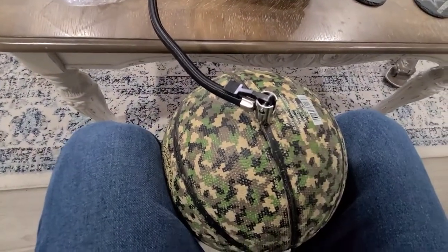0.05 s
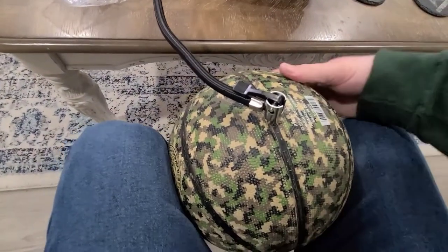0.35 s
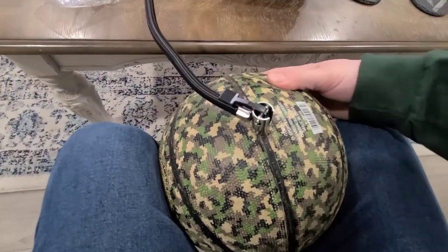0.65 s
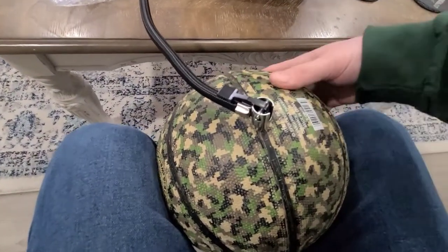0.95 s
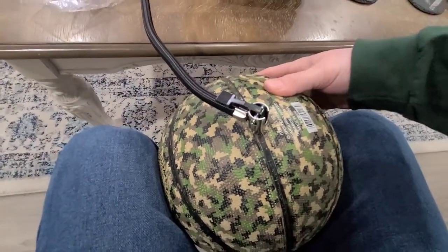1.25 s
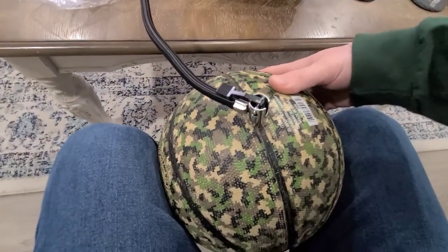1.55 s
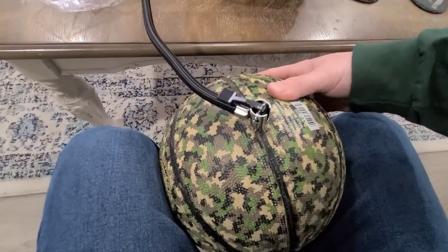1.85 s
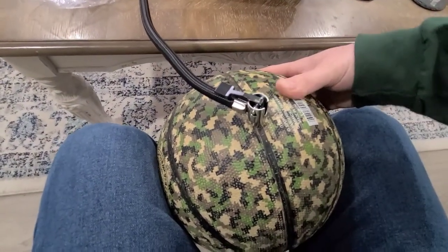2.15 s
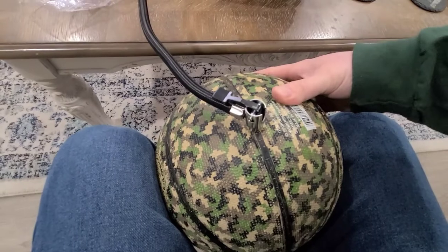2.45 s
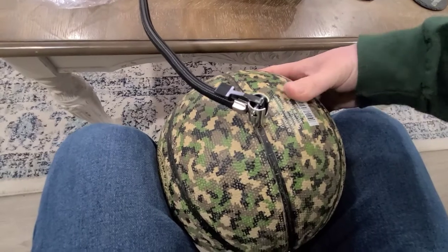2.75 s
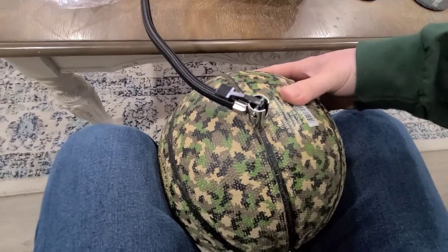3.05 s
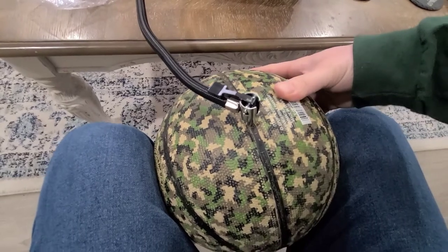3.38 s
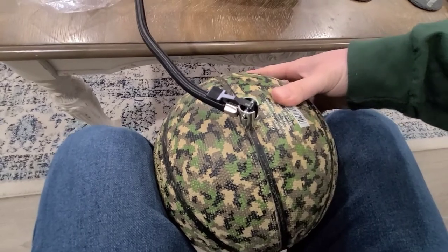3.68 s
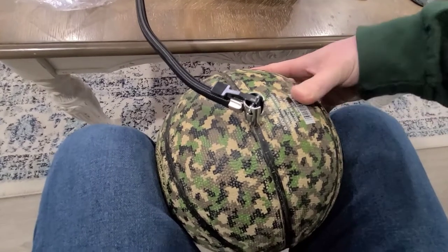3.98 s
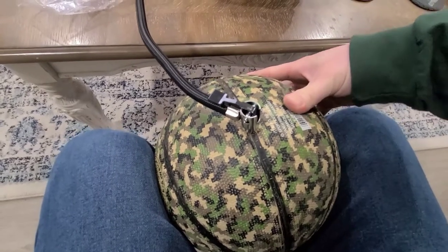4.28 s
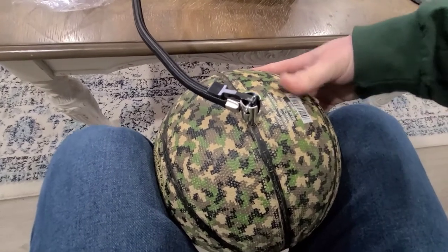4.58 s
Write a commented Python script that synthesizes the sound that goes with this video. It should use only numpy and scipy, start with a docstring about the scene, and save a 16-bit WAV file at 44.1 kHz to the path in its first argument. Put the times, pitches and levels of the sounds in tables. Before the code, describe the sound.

A small air compressor runs steadily indoors with a high gear whine, fast rattling buzz and hiss as it pumps up a ball.

```python
"""Indoors, a small geared piston compressor pumps up a ball, slowing a little as the pressure builds.
The piston shakes the housing about 48 times a second and knocks ever louder through play in its rod.
The gears whine and rattle with the load of each stroke, the motor hums, a panel sings and air hisses.
A valve ticks sharply, later only in spells. A hand thuds softly on the ball near the start.
A faint rumble lies underneath."""
import sys
import numpy as np
from scipy import signal
from scipy.fft import rfft, irfft
from scipy.io import wavfile
from scipy.ndimage import map_coordinates

SR = 44100
rng = np.random.default_rng(int(sys.argv[2]) if len(sys.argv) > 2 else 0)


def unload_audio(sound):
    """Save the sound as a 16-bit wav file, at the path given as the first command line argument."""
    columns = np.transpose(np.atleast_2d(sound))
    # keep every value between -1 and 1, then stretch to whole-number steps
    steps = np.round(np.clip(columns, -1, 1) * 32767)
    wavfile.write(sys.argv[1], SR, steps.astype(np.int16))


N = 203986
TIME_S = np.arange(N) / SR
FREQS_HZ = np.maximum(np.arange(N // 2 + 1) * SR / N, 1)
START_TURNS_PER_S = 48.554
WHEEL_TEETH, PINION_TEETH = 70, 12
REPEAT_TURNS = 6  # the same teeth meet again

# Piston and housing tones. Each row: crank multiple, level in dB, left-right in dB, left lead in rad.
PISTON_TONES = [(1, -37.0, -0.2, -0.0), (2, -36.6, -0.1, -0.0), (3, -49.0, -0.2, 0.0),
                (5, -40.0, -0.0, -0.0), (6, -42.7, 0.0, -0.2), (7, -40.3, -0.2, -0.0),
                (8, -43.1, -0.8, -0.0), (10, -53.2, -4.6, 0.4), (11, -50.4, -9.0, 0.6),
                (12, -52.8, -6.9, 1.8), (14, -35.3, 0.2, -0.1), (15, -48.9, 2.0, 1.2),
                (16, -47.5, 1.2, 0.2), (17, -36.4, 1.2, 0.5), (22, -50.1, 7.9, 1.2), (24, -45.9, 5.6, -0.1),
                (25, -48.4, 7.1, 0.8), (26, -47.7, -0.1, -2.0), (27, -43.6, 9.5, 0.5),
                (28, -49.3, 2.2, 0.4), (31, -50.4, 0.3, -1.0), (35, -45.0, -5.9, 0.1),
                (36, -50.0, -6.8, 0.4), (39, -46.2, -3.5, 2.3), (41, -44.7, -2.0, 1.1),
                (47, -47.4, -4.5, 1.6), (49, -44.1, -0.7, -3.0), (50, -42.0, -4.0, 2.8),
                (51, -36.7, -2.7, 3.1), (53, -43.6, 1.9, 2.9), (54, -38.7, -3.1, -2.5),
                (55, -43.1, 4.1, 1.8), (57, -41.7, -2.1, 1.7)]
# Gear partials round the tooth rate and its overtones.
# Each row: crank multiple, level in dB, left-right in dB, left lead in rad.
GEAR_TONES = [(58, -38.2, 5.2, 1.5), (60, -37.3, 2.9, 1.6), (61, -42.0, 10.8, 2.8), (62, -42.2, 2.2, 1.2),
              (63, -35.6, 3.2, 2.6), (64, -38.8, 8.3, 2.0), (65, -35.8, 4.1, 2.7), (66, -32.9, 5.2, 3.0),
              (67, -35.0, 2.6, 3.1), (68, -29.2, 6.2, 2.8), (69, -36.5, 6.1, 1.4), (70, -27.3, 3.3, 1.8),
              (71, -32.7, 3.1, 1.7), (126, -41.1, 6.3, 2.2), (127, -39.3, 6.7, 2.5), (128, -46, 3, 1),
              (131, -37.5, 9.5, -2.6), (135, -45, 3, 0), (146, -47, 3, 0), (147, -45, 3, 0),
              (133, -34.5, 8.7, -1.5), (134, -42.0, 6.3, -0.7), (136, -32.9, 7.4, -0.1),
              (137, -37.5, 7.3, 0.8), (138, -35.3, 9.3, -0.1), (139, -32.4, 8.7, -1.3),
              (140, -32.6, 6.4, 0.5), (141, -30.3, 6.8, -0.5), (142, -33.0, 8.1, -1.2),
              (143, -35.2, 3.0, -0.8), (209, -57.5, -9.2, 2.4), (210, -55, -11.7, 2.8),
              (211, -52, -9.2, 2.3), (279, -47, -2, 0.5), (280, -46, -3, 1), (281, -46, -2, 0)]
# Tooth load, greatest in compression. Each row: place in turns, width in turns, level in dB.
TOOTH_LOADS = [(.32, .1, -5.3), (.63, .118, 0)]
# Narrow resonances on the whine's path. Each row: centre in Hz, width in Hz, gain in dB.
WHINE_PEAKS = [(3306, 8, 3.3), (3320, 10, -1.5), (3390, 42, 0.5), (6620, 30, 0.5), (6790, 15.5, 4),
               (10090, 77, 12)]
# Base spectrum of rattle and air. Each row: frequency in Hz, density in dB per Hz.
RUSH_SPECTRUM = [(30, -66), (70, -67), (125, -66.5), (180, -74), (500, -73), (1000, -73), (1600, -67.5),
                 (2400, -58), (3300, -56.5), (3750, -68.5), (4900, -59.5), (5700, -61), (8500, -71.5),
                 (12600, -67), (13600, -58.5)]
# Housing resonances. Each row: centre in Hz, width in Hz, gain in dB.
HOUSING_PEAKS = [(300, 99, 10.5), (681, 40, 11.5), (820, 57, 12.5), (1190, 149, 8), (2035, 99, 5.5),
                 (6790, 555, 9), (10020, 91, 5.5), (13300, 140, 2.5)]
# Clatter as the load shifts. Each row: place in turns, level in dB re the steady rattle.
TOOTH_CLATTERS = [(.23, -6), (0.391, -1.5), (.73, -23), (0.99, 3)]
# Air puffs of a stroke. Each row: place in turns, width in turns, level in dB re the steady flow.
AIR_PUFFS = [(.25, 0.035, -9), (.55, 0.03, -7.5)]
# Valve tick spectrum. Each row: frequency in Hz, relative density in dB, left-right in dB.
VALVE_SPECTRUM = [(2000, -40, 0), (5000, -12, 1), (6000, -22, 0), (8500, -23, -3), (12500, -18, -7),
                  (13700, -5, -4), (14700, 3, -2), (15700, -6, 0)]
# Spells of sharp ticking, each sliding later in the stroke. Each row: start in seconds,
# end in seconds, relative level in dB, first place in turns, last place in turns.
VALVE_SPELLS = [(-0.1, 1.97, -21, .48, .52), (2.04, 2.12, -24, .52, .6), (2.35, 2.84, -21, .48, .57),
                (3.15, 3.27, -21, .47, .58), (3.55, 3.89, -19, .49, .6), (4.18, 4.35, -19, .48, .6)]
# Growth of the piston knock. Each row: time in seconds, relative level in dB.
KNOCK_CURVE = [(0, -58), (1.5, -41), (2.3, -36), (4.2, -28), (4.63, -26)]
# Single harder knocks. Each row: time in seconds, relative level in dB.
HARD_BLOWS = [(0.225, -14.5), (0.68, -30), (1.816, -23), (2.066, -22), (3.42, -22), (3.587, -19)]
# Modes rung by a knock. Each row: frequency in Hz, gain in dB, T60 in seconds.
KNOCK_RINGS = [(810, -4, 0.044), (1150, -18, 0.014), (1910, -7, 0.035), (2094, 8.5, 0.041),
               (2790, -8, 0.012)]
# Motor tones, split by the stroke. Each row: motor multiple, added crank multiple, level in dB,
# left-right in dB, left lead in rad.
MOTOR_TONES = [(1, 0, -48, -1.2, 0.1), (1, 2, -48, -0.7, 0.1), (3, -3, -45.2, -1.3, 0.4),
               (1, 8, -44.5, 0, 0), (1, 9, -45.8, -2.7, 1.4), (3, -2, -47.8, 1.3, 0.7),
               (1, 11, -48, 1, 0.5), (3, 0, -38.6, 2.9, 1.3), (4, 0, -49.1, 6.1, 0.4),
               (1, 32, -44.9, -7.2, 0.5), (7, 2, -44.5, -3.9, 1.2), (8, 0, -45, -2, 2), (1, 43, -44, -2, 2),
               (9, -3, -44.1, -4.3, 2.9), (9, 0, -41.7, 0.4, -3.1), (9, 1, -43.6, -3.3, -2.8),
               (11, -1, -40, 4, 2.5)]
# Housing panel tones. Each row: crank multiple, level in dB, left-right in dB, left lead in rad,
# throb depth from 0 to 1.
PANEL_PARTIALS = [(38, -38.6, -7.5, 0.4, .8), (42, -39.4, -5.0, 1.2, .3), (43, -35.2, -2.6, 1.4, .3),
                  (44, -39.3, -0.9, 1.0, .3)]
# Panel response as the speed passes its pitch. Each row: time in seconds, gain in dB.
PANEL_CURVE = [(0, -6), (1.2, -3), (2.0, 1), (3.2, 1.5), (3.9, -1.5), (4.63, -3)]
# Palm on the ball. Each row: start in seconds, level in dB, pitch in Hz, decay in seconds.
PALM_THUDS = [(0.282, -15.5, 122, 0.014)]
# Brief level dips. Each row: time in seconds, gain in dB, width in seconds.
LEVEL_DIPS = [(0.02, -0.8, 0.038), (2.1, -3, 0.013), (3.31, -0.5, 0.047), (4.3, -0.3, 0.054)]
# Stereo image of the noise. Each row: frequency in Hz, coherence from -1 to 1, left-right in dB.
NOISE_IMAGE = [(100, 1, 12), (315, 1, -2), (696, 0.39, 0.5), (1310, 0.39, 2), (2220, -0.085, -3.5),
               (3450, -0.36, 3.5), (6040, 0.049, 1.5), (8100, 0.019, 0.5), (10700, 0.09, -9),
               (15000, -0.14, -3)]


def crank(start_turn=-0.0204, sag_turns_per_s2=0.1921, hunt_turns=0.0022):
    """Turns made so far: the crank slows evenly as pressure builds, and hunts a little."""
    slowing = start_turn + START_TURNS_PER_S * TIME_S - sag_turns_per_s2 * TIME_S ** 2 / 2
    return slowing + hunt_turns * drift(rate_hz=0.71)


def piston(turns, waver_db=0.5):
    """Each stroke shakes the housing at multiples of the crank speed."""
    return sum(tone(turns, k, db, pan, lead, 2 * np.pi * rng.random()) * from_db(waver_db * drift(12))
               for k, db, pan, lead in PISTON_TONES)


def gear_whine(turns, swing=0.0155, fastest_turn=0.453, runout_teeth=0.03, jitter_teeth=0.0019,
               waver_db=1.26):
    """The tooth tone swoops each stroke; its partials slide through narrow resonances."""
    cycle = np.arange(2048) / 2048
    load = sum(from_db(db) * bump(cycle, place, width) for place, width, db in TOOTH_LOADS)
    # the wheel runs fastest just before compression brakes it
    wheel = cycle + swing * np.sin(2 * np.pi * (cycle - fastest_turn)) / (2 * np.pi)
    # an off-centre pinion shifts the mesh once per motor turn
    runout = runout_teeth * np.sin(2 * np.pi * turns * WHEEL_TEETH / PINION_TEETH)
    meshing = turns + (runout + jitter_teeth * drift(21)) / WHEEL_TEETH
    whine = 0
    for k, db, pan, lead in GEAR_TONES:
        overtone = round(k / WHEEL_TEETH) * WHEEL_TEETH
        swoop = load * np.exp(2j * np.pi * (overtone * wheel - k * cycle))
        whine += tone(meshing, k, db, pan, lead, np.angle(swoop.sum())) * from_db(waver_db * drift(8))
    return room(irfft(rfft(whine) * from_db(peaks_db(WHINE_PEAKS)), N))


def rattle_and_air(turns, clatter_width_turns=0.033, loose_db=-2.5, grain_db=1.23, rattle_db=-0.38,
                   air_db=-1.5, buzz_db=-3, hiss_db=-4.5, split_hz=3900, hiss_hz=12000):
    """Rattling teeth fill the housing resonances; above them air rushes in time with the stroke."""
    clatter = 1 + sum(from_db(db) * bump(turns, at, clatter_width_turns) for at, db in TOOTH_CLATTERS)
    flow = 1 + sum(from_db(db) * bump(turns, at, width) for at, width, db in AIR_PUFFS)
    teeth = worn_teeth(turns, 1, level_db=-13) + worn_teeth(turns, REPEAT_TURNS, level_db=-3.5)
    contact = teeth + from_db(loose_db) * rng.standard_normal((2, N))
    rattle = contact * from_db(rattle_db + grain_db * drift(250)) * clatter
    air = (rng.standard_normal((2, N)) + from_db(buzz_db) * teeth) * from_db(air_db) * flow
    housing_db = at_hz(RUSH_SPECTRUM)[0] + peaks_db(HOUSING_PEAKS)
    low_share = 1 / (1 + (FREQS_HZ / split_hz) ** 8)
    top_share = 1 / (1 + (hiss_hz / FREQS_HZ) ** 8)
    low_db = housing_db + 10 * np.log10(low_share)
    high_db = housing_db + 10 * np.log10(1 - low_share + 1e-12) + hiss_db * top_share
    _, pan_db = at_hz(NOISE_IMAGE)
    return coloured(rattle, low_db, pan_db) + coloured(air, high_db, pan_db)


def worn_teeth(turns, period_turns, level_db):
    """Roughness of the tooth faces, repeating as they come round."""
    points = int(SR * TIME_S[-1] / turns[-1]) * period_turns
    faces = from_db(level_db) * rng.standard_normal((2, points))
    position = turns / period_turns % 1 * points
    return np.array([map_coordinates(face, [position], order=3, mode="grid-wrap") for face in faces])


def valve(turns, crack_s=0.0013, tail_s=0.015, tail_db=-11, uneven_db=1.3, gain_db=-27, stray_turns=0.01):
    """Once a stroke the valve snaps: a bright crack with a short spray of reflections."""
    shut_turn = in_time([point for start, end, _, first, last in VALVE_SPELLS
                         for point in ((start, first), (end, last))])
    stroke, age_turns = np.divmod(turns - shut_turn - stray_turns * drift(6.4) + 1, 1)
    age_s = age_turns / START_TURNS_PER_S
    stroke_db = uneven_db * rng.standard_normal(int(stroke.max()) + 1)[stroke.astype(int)]
    burst = np.exp(-age_s / crack_s) + from_db(tail_db) * np.exp(-age_s / tail_s)
    snaps = rng.standard_normal((2, N)) * burst * tick_gain() * from_db(stroke_db + gain_db)
    return coloured(snaps, *at_hz(VALVE_SPECTRUM))


def tick_gain(attack_s=0.048, release_s=0.023, soft_db=-50):
    """The valve closes sharply in spells, softly between them."""
    gain = from_db(soft_db)
    for start, end, db, _, _ in VALVE_SPELLS:
        gate = np.minimum((TIME_S - start) / attack_s, (end - TIME_S) / release_s)
        gain = np.maximum(gain, from_db(db) * np.clip(gate + 0.5, 0, 1))
    return gain


def knock(turns, gain_db=-1, uneven_db=3, throb_db=2, jitter_s=0.0005, early_turns=0.041):
    """Play in the rod lets the piston knock once a turn, unevenly, now and then hard."""
    hits = np.flatnonzero(np.diff(np.floor(turns + early_turns)) > 0)
    hits = np.clip(hits + (jitter_s * SR * rng.standard_normal(len(hits))).astype(int), 0, N - 1)
    trend_db = in_time(KNOCK_CURVE) + throb_db * throb(turns) + gain_db
    hit_db = trend_db[hits] + uneven_db * rng.standard_normal(len(hits))
    hard_s, hard_db = np.transpose(HARD_BLOWS)
    hits = np.append(hits, (hard_s * SR).astype(int))
    hit_db = np.append(hit_db, hard_db)
    ringing = 0
    for hz, db, t60_s in KNOCK_RINGS:
        blows = np.full((2, N), 1e-18)
        blows[:, hits] = from_db(hit_db + db) * (1 + 0.25 * rng.standard_normal((2, len(hits)))) / 2
        radius, step_rad = from_db(-60 / (t60_s * SR)), 2 * np.pi * hz / SR
        feedback = [1, -2 * radius * np.cos(step_rad), radius ** 2]
        ringing += signal.lfilter([0, np.sin(step_rad)], feedback, blows)
    return ringing


def motor(turns, waver_db=1.5, slip_rad=0.6):
    """The faster motor shaft adds unsteady tones that beat against the piston's."""
    ratio = WHEEL_TEETH / PINION_TEETH
    hum = 0
    for m, k, db, pan, lead in MOTOR_TONES:
        phase_rad = 2 * np.pi * rng.random() + slip_rad * drift(2.9)
        hum += tone(turns, m * ratio + k, db, pan, lead, phase_rad) * from_db(waver_db * drift(5.5))
    return hum


def panel(turns, struck_turn=0.019):
    """A housing panel, jolted once a turn, sings and swells each time the same teeth meet."""
    swell = throb(turns)
    tones = sum(tone(turns - struck_turn, k, db, pan, lead, 0) * (1 + depth * swell)
                for k, db, pan, lead, depth in PANEL_PARTIALS)
    return tones * from_db(in_time(PANEL_CURVE))


def palm(rise_s=0.0093):
    """A soft hand makes the ball thud briefly."""
    thuds = 0
    for start_s, db, hz, decay_s in PALM_THUDS:
        age_s = np.maximum(TIME_S - start_s, 0)
        envelope = (1 - np.exp(-age_s / rise_s)) * np.exp(-age_s / decay_s)
        thuds += from_db(db) * np.sin(2 * np.pi * hz * age_s) * envelope
    return thuds


def room(direct, t60_s=0.35, wet_db=-11.5, delay_s=0.004):
    """Dying reflections, in which sliding partials swell and fade."""
    age_s = TIME_S[:int(t60_s * SR)]
    echoes = rng.standard_normal((2, len(age_s))) * from_db(-60 * age_s / t60_s) * (age_s > delay_s)
    echoes *= from_db(wet_db) / np.sqrt((echoes ** 2).sum(axis=1, keepdims=True))
    return (direct + signal.fftconvolve(direct, echoes, axes=1)[:, :N]) / np.hypot(1, from_db(wet_db))


def rumble(density_db=-67, top_hz=70):
    """A faint deep rumble, different in each channel."""
    spectrum = rfft(rng.standard_normal((2, N))) / np.sqrt(1 + (FREQS_HZ / top_hz) ** 6)
    return from_db(density_db) * np.sqrt(SR / 2) * irfft(spectrum, N)


def machine_db(fade_db_per_s=0.5, waver_db=0.51):
    """The machine's level fades slowly, wavers and dips briefly."""
    dips_db = sum(db * np.exp(-0.5 * ((TIME_S - s) / width) ** 2) for s, db, width in LEVEL_DIPS)
    return fade_db_per_s * (TIME_S.mean() - TIME_S) + waver_db * drift(7.2) + dips_db


def throb(turns, lead_turns=1.4):
    """A swing from -1 to 1 that peaks each time the same teeth meet."""
    return np.cos(2 * np.pi * (turns + lead_turns) / REPEAT_TURNS)


def tone(turns, multiple, db, pan_db, lead_rad, phase_rad):
    """A partial locked to the crank; reflections set the channels out of step."""
    angle = 2 * np.pi * (multiple * turns % 1) + phase_rad - lead_rad * np.array([[0], [1]])
    return np.sqrt(2) * panned(db, pan_db) * np.cos(angle.astype(np.float32))


def coloured(pair, db, pan_db):
    """Shapes two unrelated white signals into partly coherent stereo noise."""
    coherence, _ = at_hz(NOISE_IMAGE)
    mid, side = rfft(pair)
    stereo = np.sqrt(1 + coherence) * mid + np.sqrt(1 - coherence) * side * [[1], [-1]]
    return irfft(stereo * panned(db, pan_db), N) * np.sqrt(SR) / 2


def bump(turns, place, width):
    """A smooth swell of height 1, once a turn."""
    return np.exp((np.cos(2 * np.pi * (turns - place)) - 1) / (2 * np.pi * width) ** 2)


def drift(rate_hz):
    """Low-passed noise of spread 1."""
    slow = irfft(rfft(rng.standard_normal(N)) / (1 + (FREQS_HZ / rate_hz) ** 2), N)
    return slow / slow.std()


def peaks_db(rows):
    """Gain of a set of resonances at every frequency."""
    return sum(db * np.exp(-0.5 * ((FREQS_HZ - hz) / width) ** 2) for hz, width, db in rows)


def at_hz(rows):
    """Each column of a spectrum at every frequency."""
    hz, *columns = np.transpose(rows)
    return [np.interp(np.log(FREQS_HZ), np.log(hz), column) for column in columns]


def in_time(rows):
    """A curve at every sample."""
    return np.interp(TIME_S, *np.transpose(rows))


def panned(db, pan_db):
    """Left and right gains."""
    return from_db(db + pan_db * np.array([[0.5], [-0.5]]))


def from_db(db):
    """Decibels to gain."""
    return 10 ** (np.asarray(db) / 20)


def scene(gear_share=0.84):
    """One crank times all the machine's layers; palm and rumble are added."""
    turns, level_db = crank(), machine_db()
    body = from_db(level_db) * (piston(turns) + motor(turns))
    gears = from_db(gear_share * level_db) * gear_whine(turns)
    rush = from_db(level_db) * rattle_and_air(turns)
    return body + gears + rush + panel(turns) + rumble() + knock(turns) + valve(turns) + palm()


def record(dry, low_hz=22, top_hz=15770):
    """Cuts the deepest bass and, steeply, the top."""
    high_pass = 1 / np.sqrt(1 + (low_hz / FREQS_HZ) ** 4)
    low_pass = 1 / np.sqrt(1 + (FREQS_HZ / top_hz) ** 800)
    return irfft(rfft(dry) * high_pass * low_pass, N)


dry = scene()
out = record(dry)
unload_audio(out)
```